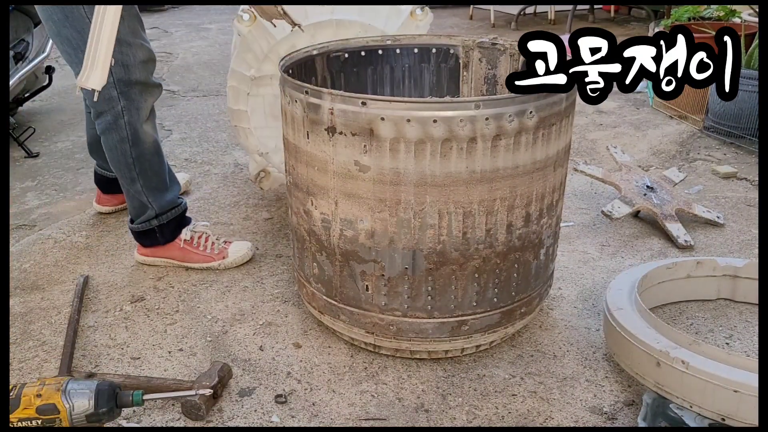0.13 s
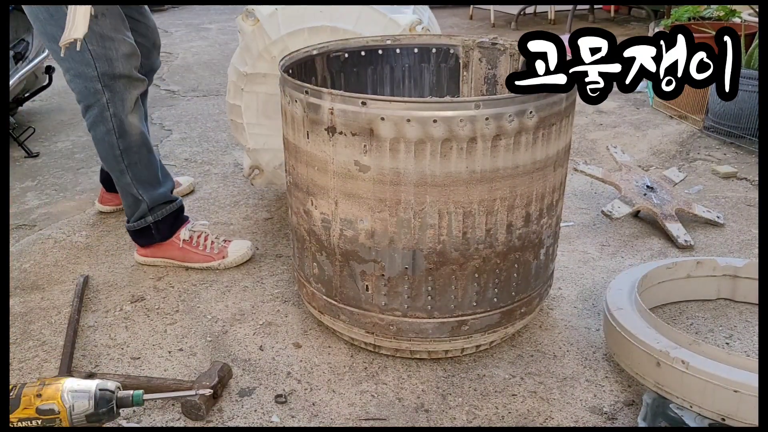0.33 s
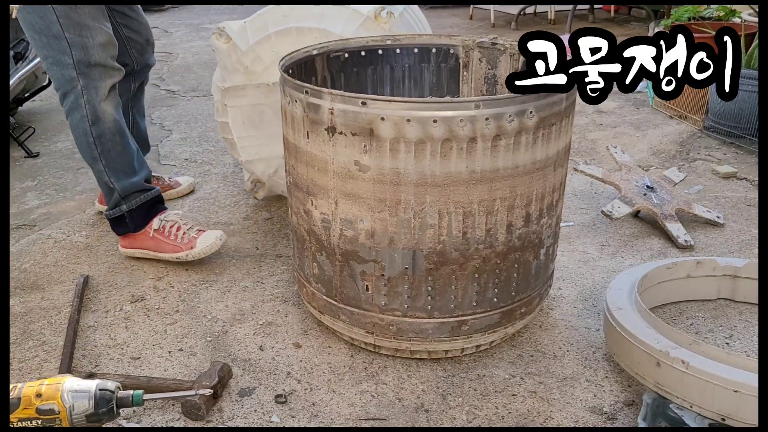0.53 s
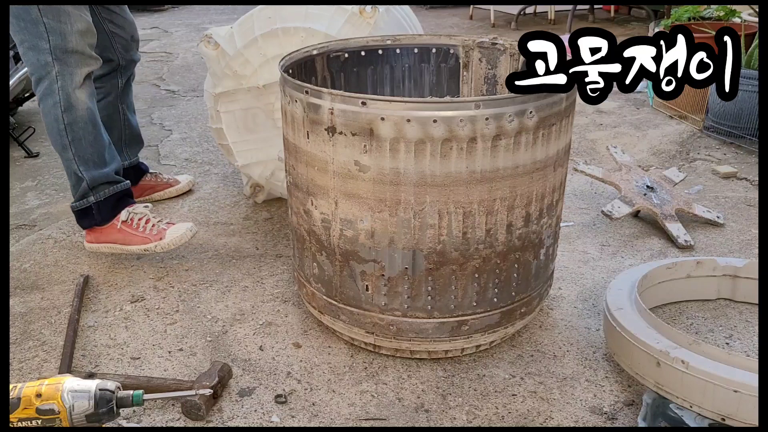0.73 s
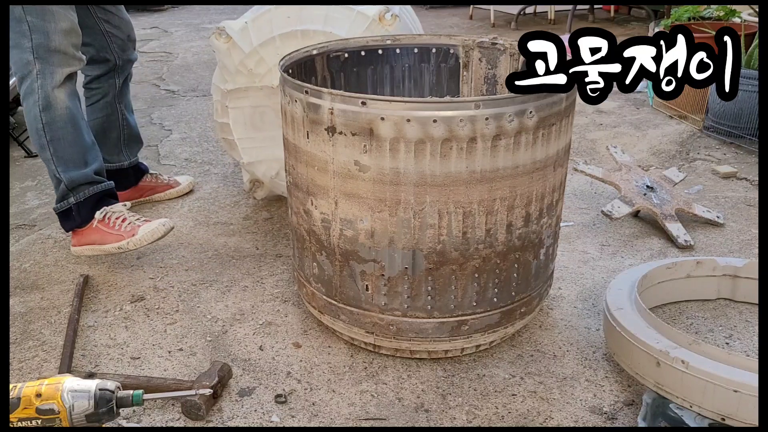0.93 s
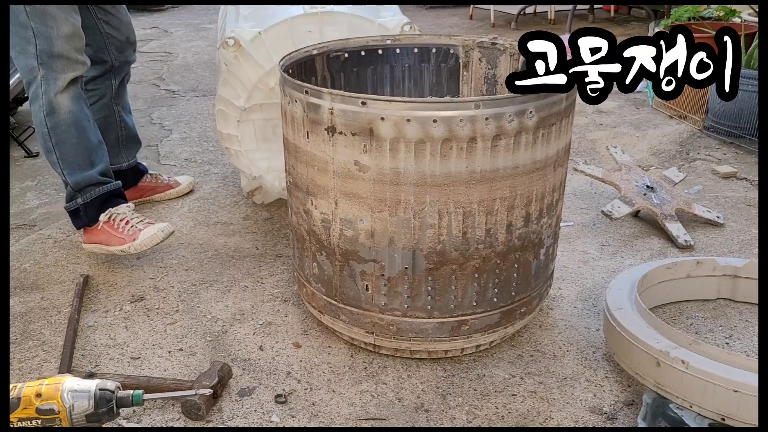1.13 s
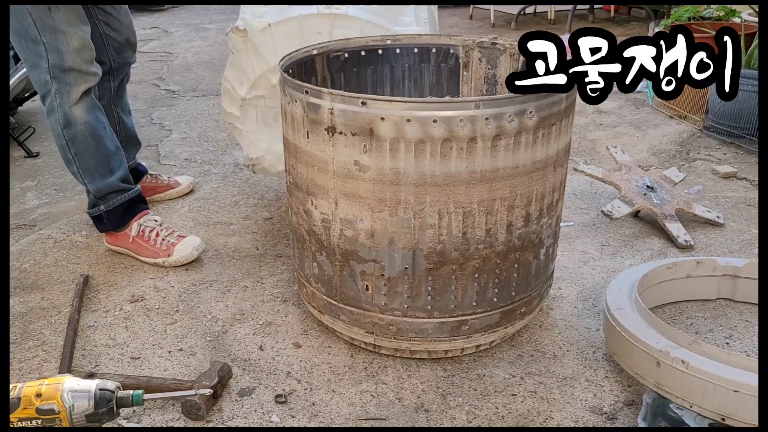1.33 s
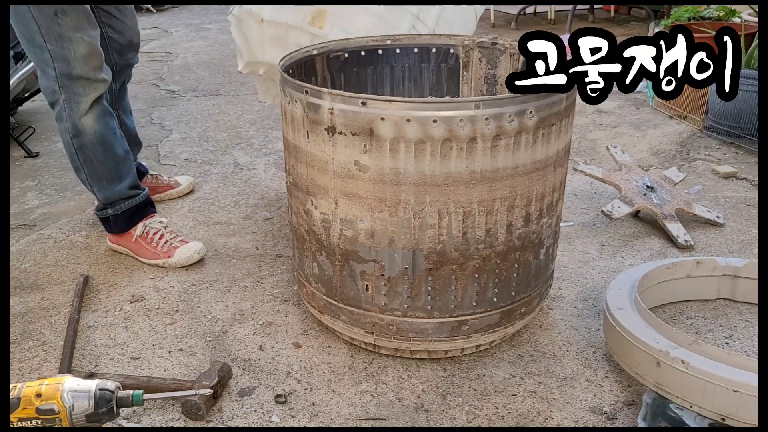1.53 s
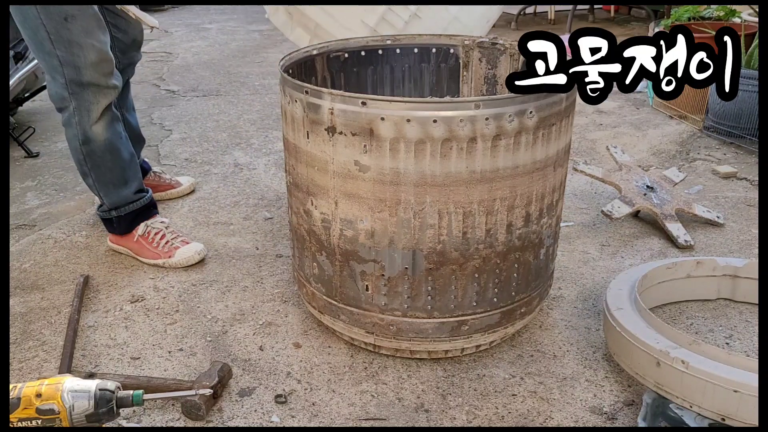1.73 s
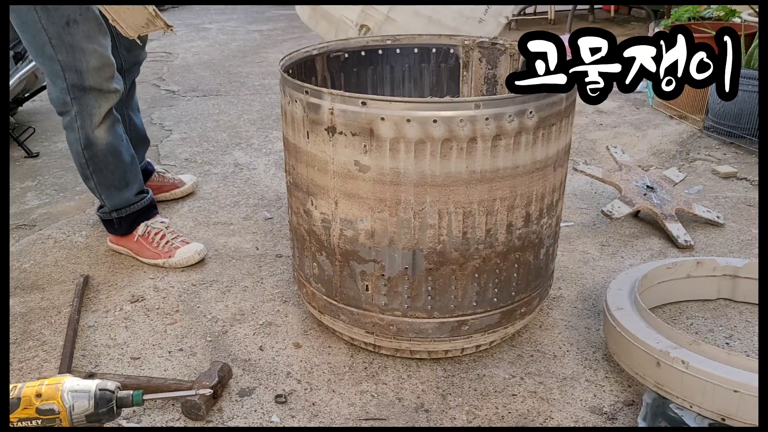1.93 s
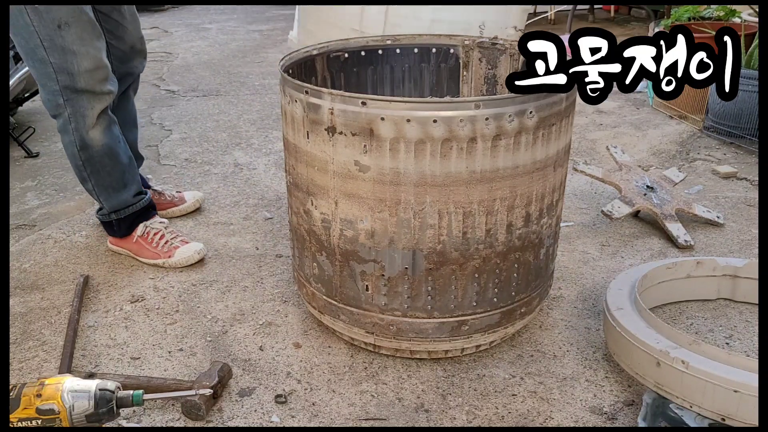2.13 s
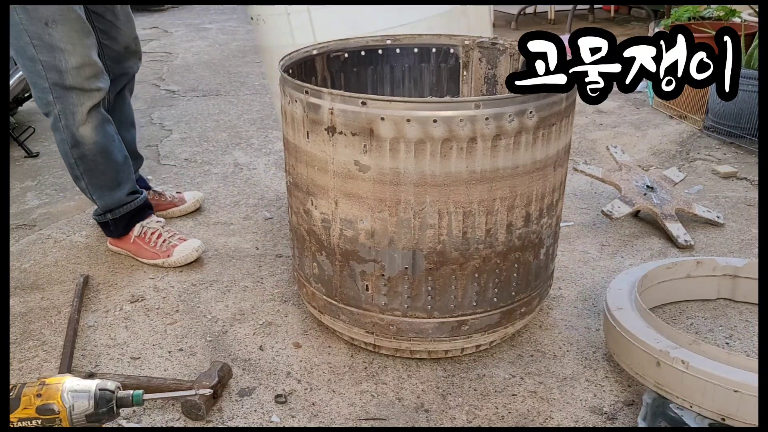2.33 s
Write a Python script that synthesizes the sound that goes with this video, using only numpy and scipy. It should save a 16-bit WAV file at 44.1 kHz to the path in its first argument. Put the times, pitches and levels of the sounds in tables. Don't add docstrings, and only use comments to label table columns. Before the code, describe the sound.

Close stereo microphones in an echoing yard catch a hollow tub slamming down with a hard slap, tumbling thuds and gritty scuffs, then lighter knocks and a brief metal rattle under low wind gusts.

```python
import sys
import numpy as np
from scipy import signal
from scipy.fft import rfft, irfft
from scipy.io import wavfile
from scipy.ndimage import uniform_filter1d

SR = 44100
rng = np.random.default_rng(int(sys.argv[2]) if len(sys.argv) > 2 else 0)


def undo_db(level):
    steps = np.asarray(level, float) / 20
    return 10 ** steps


def unload_wav(signal):
    wavfile.write(
        sys.argv[1],
        SR,
        np.round(np.clip(np.atleast_2d(signal).T, -1, 1) * 32767).astype(np.int16),
    )


N = 105840


def evened(x):
    return x / np.sqrt(np.mean(x ** 2) + 1e-20)


def wander(shape, window):
    return evened(uniform_filter1d(rng.standard_normal(shape), window))


def read(points, hz):
    f, value = np.transpose(points)
    return np.interp(np.log(hz + 1), np.log(f + 1), value)


def add(mix, s, sound):
    part = mix[..., round(s * SR):][..., :sound.shape[-1]]
    part += sound[..., :part.shape[-1]]


def colour(x, points):
    hz = np.fft.rfftfreq(x.shape[-1], 1 / SR)
    low_edge = 1 / (1 + (points[0][0] / (hz + 1)) ** 4)
    high_edge = 1 / (1 + (hz / points[-1][0] / 2) ** 4)
    return evened(irfft(rfft(x) * undo_db(read(points, hz)) * low_edge * high_edge, x.shape[-1]))


def rings(modes, seconds, pitch=1):
    t = np.arange(round(seconds * SR)) / SR
    total = np.zeros((2, len(t)))
    for hz, db, t60 in modes:
        start, side = rng.random(2)
        phase = start + np.array([[0], [np.sign(side - .5) / 4]])
        total += undo_db(db - 60 * t / t60) * np.sin(2 * np.pi * (hz * pitch * t + phase))
    return total


# frequency in Hz, left-right correlation.
LIKENESS = [(180, 0.82), (300, 0.81), (600, 0.014), (3000, -0.082)]


def pair(x):
    same = np.clip(read(LIKENESS, np.fft.rfftfreq(N, 1 / SR)), -1, 1)
    a, b = rfft(x)
    return irfft(np.array([a, same * a + np.sqrt(1 - same ** 2) * b]), N)


# frequency in Hz, level in dB per Hz.
TOWN_TONE = [(100, 5.5), (280, -9.5), (800, -10.5), (1100, -18.5), (3050, -31.5), (15600, -41.5)]


def distant_town():
    level_db = -58 + wander(N, 6000)
    return undo_db(level_db) * colour(rng.standard_normal((2, N)), TOWN_TONE)


# time in seconds, gust level in dB.
WIND_LEVEL = [(0, -53.5), (.3, -57.5), (1.02, -48.5), (1.2, -41), (1.45, -44), (1.58, -50), (1.75, -46.5),
              (2.05, -51), (2.25, -58), (2.4, -39)]
# frequency in Hz, level in dB per Hz.
WIND_TONE = [(20, 6), (45, -1.5), (70, 8.5), (103, -7), (140, -9), (250, -16.5)]
# centre in seconds, level in dB, frequency in Hz, left minus right in dB.
BUFFETS = [(0.771, -30.5, 53, 22), (1.024, -38.5, 76, -16.5), (1.251, -30.5, 70, -4),
           (1.454, -23.5, 64, -8), (1.491, -25, 111, 0), (1.678, -39, 61.7, 3), (1.685, -34, 128, 1),
           (0.029, -42.5, 140, -1), (1.661, -45, 400, 0), (1.745, -41, 390, -9), (1.783, -38, 67, -3),
           (1.948, -30.5, 45, 19.5), (1.991, -31.5, 60.6, -16), (2.372, -36, 56.1, 17)]


def wind():
    t = np.arange(N) / SR
    lumps = evened(uniform_filter1d(uniform_filter1d(rng.standard_normal((2, N)), 1500), 1500))
    pressure = colour(rng.standard_normal((2, N)) * undo_db(4.8 * lumps), WIND_TONE)
    out = pressure * undo_db(np.interp(t, *np.transpose(WIND_LEVEL)) + 6.0)
    for s, db, hz, pan_db in BUFFETS:
        cycles = (t - s) * hz
        pan = undo_db([[pan_db / 2], [-pan_db / 2]])
        swing = np.sin(2 * np.pi * cycles + np.array([[0], [1.2]]))
        out += undo_db(db) * pan * np.exp(-(cycles / 0.82) ** 2) * swing
    return out


# frequency in Hz, t60 in seconds.
YARD_WALLS = [(150, 0.72), (500, 0.37), (1500, 0.3), (4000, 0.37), (9000, 0.25)]


def echoes(x):
    first, spacing, length = 300, 20, SR // 2
    taps = np.zeros((2, length))
    at = np.arange(first, length - spacing, spacing)
    at = at + rng.integers(0, spacing, (2, len(at)))
    np.put_along_axis(taps, at, rng.choice([-1., 1.], at.shape), 1)
    hz, t, z = signal.stft(taps, SR, nperseg=256)
    dying = undo_db(-60 * t / read(YARD_WALLS, hz)[:, None])
    tail = signal.istft(z * dying, SR, nperseg=256)[1]
    return signal.fftconvolve(x, tail / np.linalg.norm(tail[0]), axes=1)[:, :N]


# frequency in Hz, level in dB, t60 in seconds.
SHELL = [(224.4, -4, 0.89), (331.3, -8, 0.78), (256.94, -1.5, 2.11), (264.9, -3, 1.55), (288.8, -1.5, 1.31),
         (302.4, -8, 2.3), (366.9, -1, 0.4)]
# time in seconds, coupling in dB.
LEAN = [(.25, -12.5), (0.419, -4), (.5, 0), (.75, 0), (0.899, 6), (1.119, 4), (1.25, -8), (1.55, -3),
        (1.75, 8)]


def drum_hum(tub, booms):
    shaking = abs(booms) * rng.standard_normal((2, N)) + tub
    shaking = shaking * undo_db(np.interp(np.arange(N) / SR, *np.transpose(LEAN)))
    hum = signal.fftconvolve(shaking, rings(SHELL, 1.1), axes=1)[:, :N]
    return undo_db(-53) * hum * undo_db(2.7 * wander(N, SR // 50))


# start in seconds, level in dB, frequency in Hz, t60 in seconds.
TOUCH = (1.81, -47, 399, 1.1)


def drum_touch():
    s, level_db, hz, t60 = TOUCH
    rise = np.minimum(np.arange(SR // 2) / SR / .03, 1)
    return s, rings([(hz, level_db, t60)], .5) * rise


# frequency in Hz, level in dB, t60 in seconds.
DRUM_RIM = [(1179, -1, .1), (1290, -2, .1), (1416, -4, .12), (1647, -8, .3), (2083, -4, .07),
            (3300, -8, .04)]


def drum_rattle():
    brush = rng.standard_normal((2, round(0.016 * SR)))
    ring = signal.fftconvolve(brush, rings(DRUM_RIM, .5), axes=1)
    return 1.593, undo_db(-27.5) * ring / abs(ring).max() * 2


# start in seconds, length in seconds, level in dB, first Hz, last Hz.
SQUEAKS = [
    (.13, 0.0306, -50, 4050, 4126),
    (.14, 0.035, -45, 1726, 1550),
    (.95, 0.094, -52.5, 863, 805),
    (2.17, 0.18, -66, 1400, 1334),
]


def squeak(s, length, level_db, hz, end_hz):
    u = np.linspace(0, 1, round(length * SR))
    fuzz = wander((2, len(u)), 150)
    turns = np.cumsum(hz + (end_hz - hz) * u + 0.045 * hz * fuzz, axis=1) / SR
    return s, undo_db(level_db) * np.sqrt(abs(np.sin(np.pi * u))) * np.sin(2 * np.pi * turns)


# start and length in seconds, level in dB, grit in dB, rise in seconds.
BRUSHES = [(1.128, 0.2284, -49, -2, 0.032), (1.19, 0.099, -53, -6, 0.019), (1.455, 0.079, -60, 12, 0.0059),
           (1.525, 0.078, -49.5, 11.5, 0.014), (1.593, 0.026, -34, 3, 0.0037),
           (1.63, 0.053, -44.5, -0.5, 0.0066), (1.72, 0.029, -58.5, 15, 0.0091)]
# frequency in Hz, level in dB.
BRUSH_BODY = [(350, -14), (700, 6), (1350, 6.5), (1800, -6.5), (3300, -13.5), (6000, -33), (12000, -54)]
# start and length in seconds, level in dB, grit in dB, rise in seconds.
DRAGS = [(.13, 0.096, -41.5, -7.5, 0.0096), (.219, 0.05, -26.5, -1, 0.0023),
         (.275, 0.076, -43.5, 9, 0.0049), (.498, 0.17, -35.5, -5.5, 0.0022), (.636, 0.062, -37, 0, 0.0042),
         (0, 0.092, -53, 3, 0.0012)]
# frequency in Hz, level in dB.
DRAG_BODY = [(200, 5.5), (300, 5.5), (616, 0.5), (1350, -13.5), (1550, -12), (3400, -21), (6000, -44),
             (12000, -46)]
# start and length in seconds, level in dB, grit in dB, rise in seconds.
SCUFFS = [(.2, .018, -35.5, -17, 0.012), (.219, 0.023, -22.5, -11.5, 0.0039),
          (.243, .014, -26, -15, 0.0033), (.428, 0.02, -34.5, -33, 0.0084),
          (.497, 0.035, -28.5, -4, 0.0024), (.535, 0.044, -41, -22, 0.0032),
          (.562, 0.019, -27.5, -6, 0.0043), (1.28, 0.035, -43, -6, 0.0017), (1.77, 0.071, -57, -5, .005)]
# frequency in Hz, level in dB.
SCUFF_BODY = [(400, 0), (650, 6), (950, -2), (1350, -6), (1600, -28.5), (2600, -22.5), (4000, -52),
              (9000, -71)]
# frequency in Hz, level in dB per Hz.
GRIT = [(4000, -6), (5200, 1), (9070, 1.5), (15600, -6.5)]


def rim_grind(strokes, body_tone):
    slips_per_s, release_s, grit_level_db = 5500, 0.0068, -20.5
    t = np.arange(N) / SR
    size = undo_db(2.85 * np.minimum(rng.exponential(1, (2, N)), 3))
    slips = size * (rng.random((2, N)) < slips_per_s / SR) * rng.standard_normal((2, N))
    slips = slips * undo_db(1.7 * wander(N, SR // 100))
    body = colour(slips, body_tone)
    grit = colour(1.1 * evened(slips) + rng.standard_normal((2, N)), GRIT)
    out = np.zeros((2, N))
    for s, length, level_db, grit_db, rise in strokes:
        stroke = np.clip((t - s) / rise, 0, 1) * np.exp(-np.maximum(t - s - length, 0) / release_s)
        out += stroke * undo_db(level_db) * (body + undo_db(grit_level_db + grit_db) * grit)
    return out


# (Hz, dB).
CLACKS = [
    (.2685, -13, .0055, [(581, 0), (1000, -6), (1420, -5), (2050, -8), (2710, -17), (3680, -21), (4900, -20)]),
    (.564, -28, .015, [(500, 0), (760, -2), (1150, -6), (1420, -7)]),
    (.655, -28, .012, [(580, 0), (1230, -4), (1800, -8), (3300, -16)]),
    (1.282, -38, .025, [(554, 0), (824, -7), (1140, -3), (1310, -5)]),
    (1.572, -37, .008, [(640, -2), (770, 0), (1000, -6)]),
    (2.376, -44, .02, [(930, 0), (2030, -4), (2450, -8)]),
]


def rim_clack(s, level_db, contact, partials):
    t = np.arange(SR // 20) / SR
    held = np.minimum(t / (.2 * contact), 1) * np.exp(-np.maximum(t - contact, 0) / (.3 * contact))
    return s, undo_db(level_db) * held * rings([(hz, db, 30 * contact) for hz, db in partials], len(t) / SR)


# start in seconds, level in dB, contact in seconds, pitch factor, hardness in dB.
KNOCKS = [(.268, -7.5, 0.005, 1, 4.5), (.436, -26.5, 0.021, 0.7, -9.5), (.556, -20, 0.017, 1.02, -17),
          (.604, -22, 0.01, .87, -15), (.635, -25.5, 0.0094, 0.85, -3.5), (.654, -20.5, 0.013, 1.05, 4),
          (.697, -27.5, 0.0054, 0.83, 0), (.782, -40.5, 0.027, 1, -4), (.782, -41.5, .03, .92, -19),
          (.833, -38, 0.021, .88, -12), (.86, -37, 0.011, .75, -17), (1.127, -40, 0.015, 1, -4),
          (1.281, -33.5, 0.022, 1.1, -5), (1.543, -34.5, 0.04, 0.965, 4.5), (1.571, -28.5, 0.0057, 1.14, 2),
          (1.668, -31, 0.03, 1.03, -2), (1.77, -32, 0.012, 0.9, -16), (2.376, -20.5, 0.017, 0.99, -6.5)]
# frequency in Hz, level in dB.
WALL = [(430, -6.5), (575, 2), (745, 1), (960, -11.5), (1200, -4.5), (1410, -10), (2050, -8.5),
        (2700, -17.5), (3680, -35), (4900, -23)]
# frequency in Hz, level in dB per Hz.
CRACK = [(250, -6.5), (600, -7), (1450, -18), (3120, -23.5), (5200, -34.5), (6130, -45.5), (15500, -43.5)]


def wall_knock(crack, s, level_db, contact, pitch, hard_db):
    t = np.arange(SR // 10) / SR
    after = np.maximum(t - contact, 0)
    push = np.minimum(t / 0.00088, 1) * undo_db(-60 * after / 0.057)
    held = np.minimum(t / (0.23 * contact), 1) * undo_db(-60 * after / .03)
    chatter = undo_db(2.5 * wander(len(t), 70))
    modes = [(hz, db + hard_db * 0.35 * np.log2(hz / 600), 450 / hz) for hz, db in WALL]
    wall = rings(modes, len(t) / SR, pitch) * chatter * held
    snap = push * crack[:, round(s * SR / 2):][:, :len(t)]
    return s, undo_db(level_db) * (0.32 * wall + undo_db(2 * hard_db - 17.0) * snap)


# start in seconds, level in dB, pitch in Hz, t60 in seconds.
BOOMS = [(.14, -31.5, 145.5, 0.6), (0.187, -19.5, 132, 0.065), (0.205, -19.5, 144, 0.071),
         (0.267, -2, 139.8, 0.075), (.303, -10.5, 157.6, 0.7), (0.373, -9, 123, 0.047),
         (0.394, -14, 150.7, 0.03), (0.4408, -6.5, 114.7, 0.054), (0.504, -24, 118.6, 0.54),
         (0.566, -5.5, 140.3, 0.088), (0.596, -12.5, 116.3, 0.085), (.643, -10.5, 135.5, 0.06),
         (.65, -3.5, 139.4, 0.036), (0.69, -15.5, 141.5, 0.053), (.727, -21.5, 126, 0.15),
         (0.748, -33, 101, 0.12), (0.792, -30, 155.8, 0.27), (0.852, -30.5, 132.6, 0.056),
         (1.126, -31.5, 160.6, 0.027)]


def floor_boom(s, level_db, hz, t60, next_s):
    rise_s, glide, glide_s = 0.011, 0.26, 0.0081
    t = np.arange(SR // 2) / SR
    rise = np.sin(np.pi / 2 * np.minimum(t / rise_s, 1)) ** 2
    decay = undo_db(level_db - 60 * np.maximum(t - rise_s, 0) / t60)
    choke = np.exp(-np.maximum(t + s - next_s, 0) / rise_s)
    turns = hz * (t - glide * glide_s * (1 - np.exp(-t / glide_s)))
    return s, rise * decay * choke * np.sin(2 * np.pi * turns) + 1e-12


def scene():
    air = wind() + pair(distant_town())
    booms = np.zeros(N)
    next_starts = [row[0] for row in BOOMS[1:]] + [N / SR]
    for row, next_s in zip(BOOMS, next_starts):
        add(booms, *floor_boom(*row, next_s))
    tub = rim_grind(DRAGS, DRAG_BODY) + rim_grind(BRUSHES, BRUSH_BODY)
    add(tub, *drum_rattle())
    add(tub, *drum_touch())
    for row in SQUEAKS:
        add(tub, *squeak(*row))
    crack = colour(rng.standard_normal((2, N)), CRACK)
    for row in KNOCKS:
        add(tub, *wall_knock(crack, *row))
    hum = drum_hum(tub, booms)
    tub = tub + rim_grind(SCUFFS, SCUFF_BODY)
    for row in CLACKS:
        add(tub, *rim_clack(*row))
    wet = undo_db(-5.5) * echoes(tub + 0.43 * booms)
    return air + booms * undo_db([[-.3], [.3]]) + pair(tub + hum + wet)


def low_pass(x):
    return signal.sosfilt(signal.butter(12, 15720, fs=SR, output="sos"), x)


def record(dry):
    mix = 1.282 * np.tanh(dry / 1.29)
    return low_pass(mix)


dry = scene()
out = record(dry)
unload_wav(out)
```